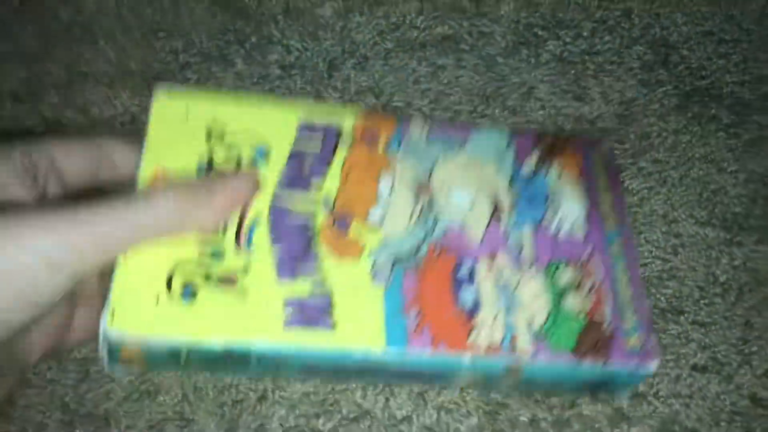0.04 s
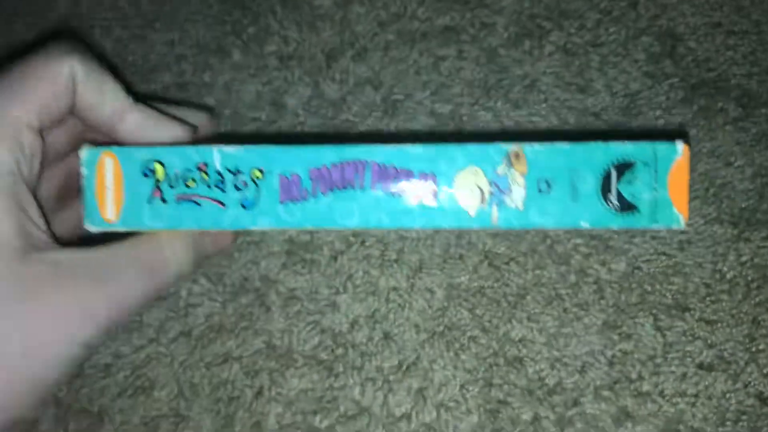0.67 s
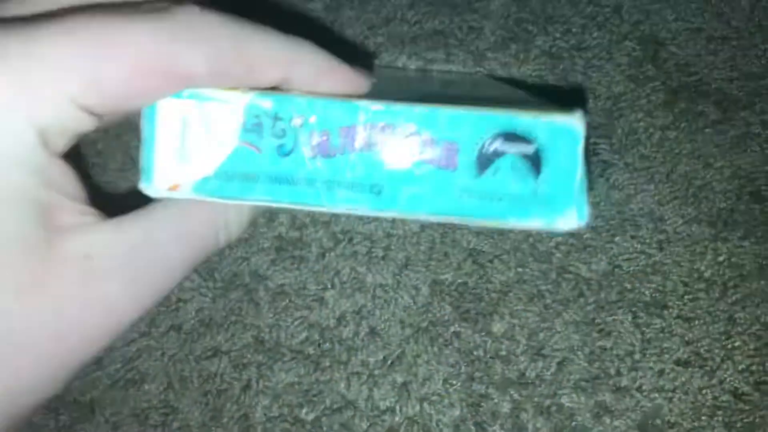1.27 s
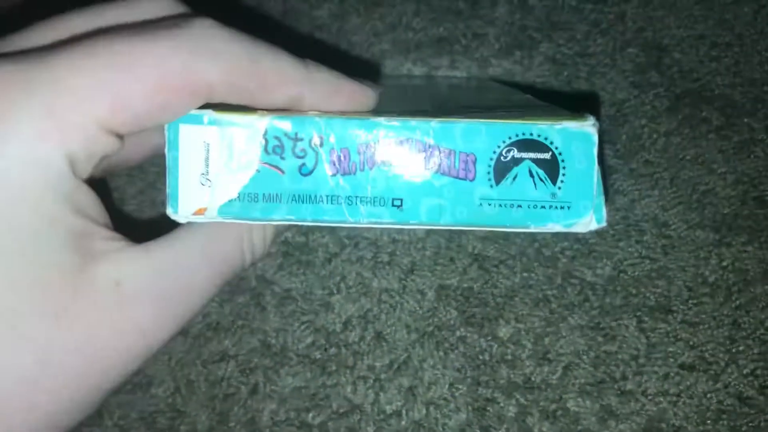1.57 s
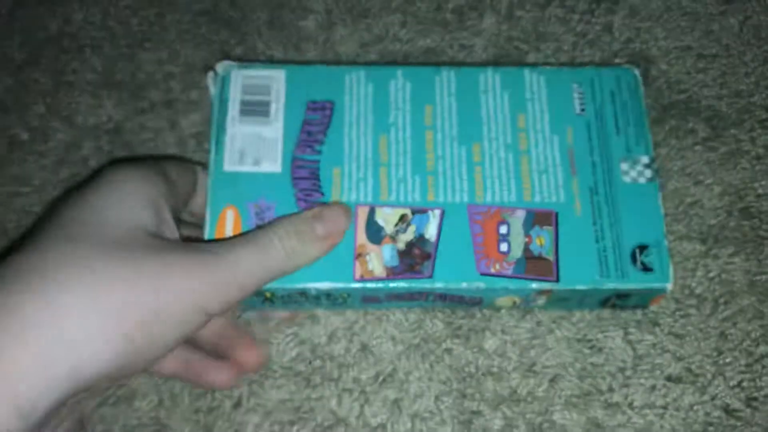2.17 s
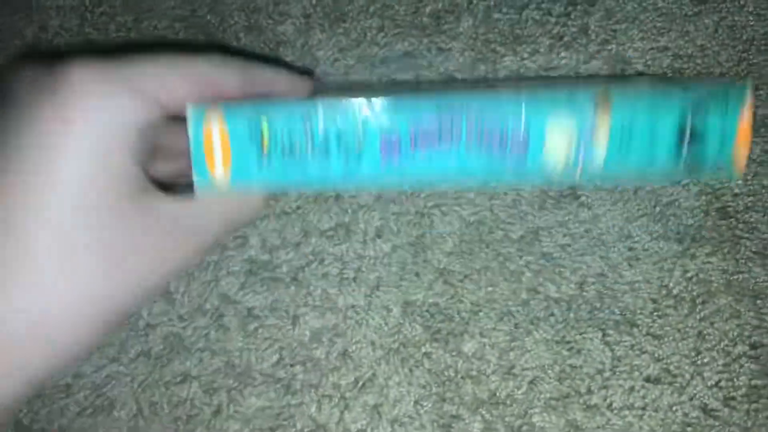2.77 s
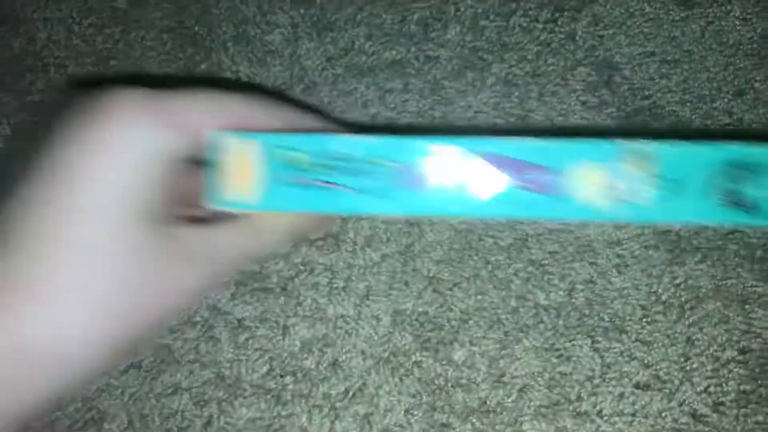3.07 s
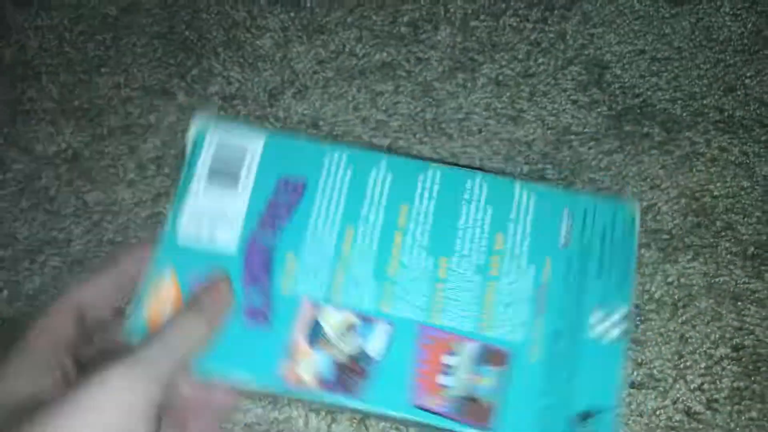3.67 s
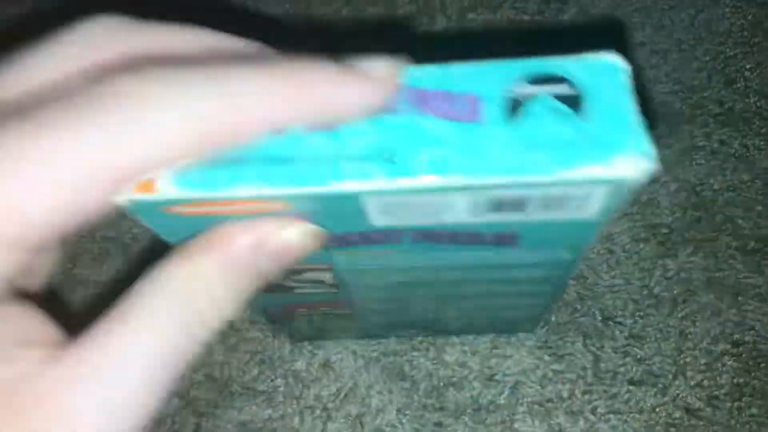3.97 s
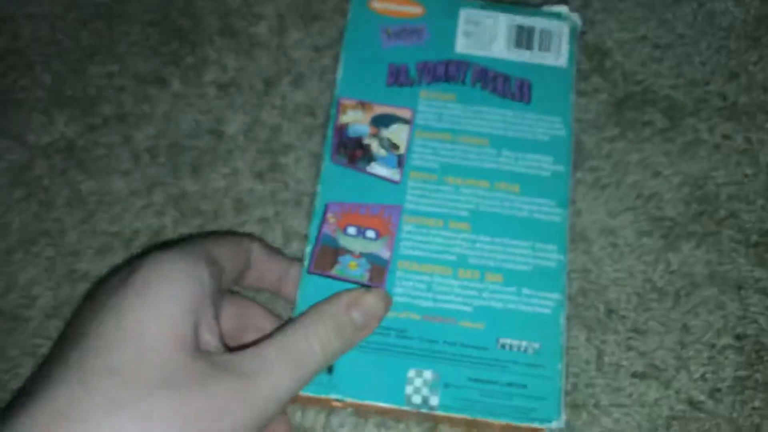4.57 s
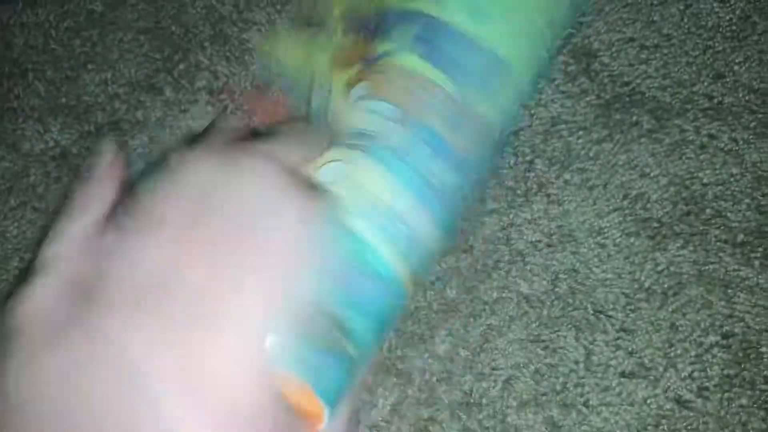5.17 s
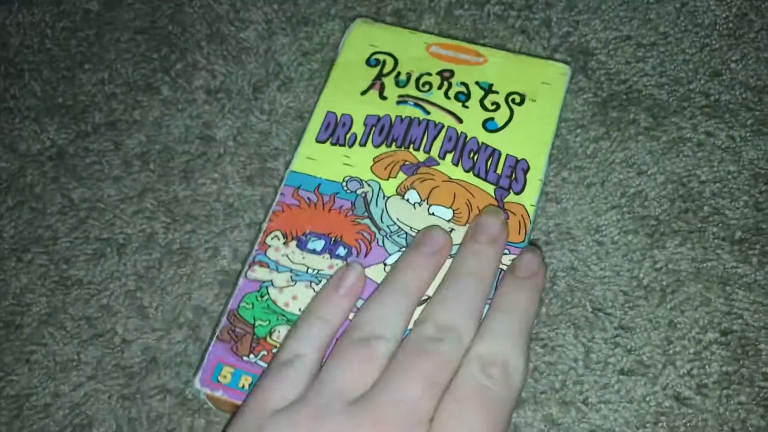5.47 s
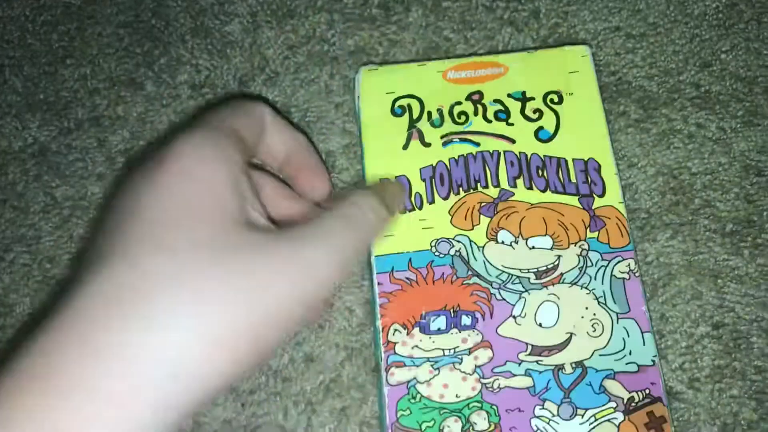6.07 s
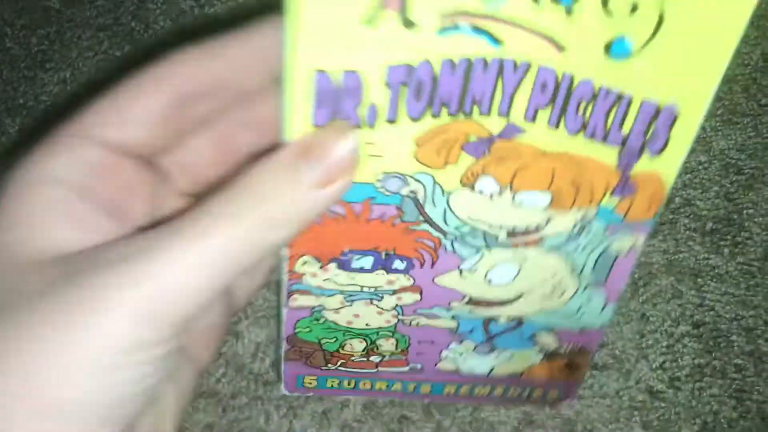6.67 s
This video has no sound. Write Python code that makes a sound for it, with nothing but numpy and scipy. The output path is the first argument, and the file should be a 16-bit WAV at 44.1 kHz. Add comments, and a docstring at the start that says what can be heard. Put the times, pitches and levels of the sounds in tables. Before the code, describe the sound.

Hollow knocks and rattles of a boxed video cassette being turned over, with fingers ticking and sliding on cardboard over a faint hum.

```python
"""A video cassette in its cardboard sleeve is turned over by hand and set down on a carpet, close up.
Each knock thumps the box and makes the loose reels clatter in the hollow plastic shell; now and then
a small steel spring inside sings on. The carpet takes the weight with a soft thud. Fingers tick and
slide on the sleeve, and a small damped room with a faint mains hum lies behind."""
import sys
import numpy as np
from scipy import signal
from scipy.fft import rfft, irfft, next_fast_len
from scipy.io import wavfile
from scipy.ndimage import uniform_filter1d, map_coordinates

SR = 44100
rng = np.random.default_rng(int(sys.argv[2]) if len(sys.argv) > 2 else 0)


def pcm_store(signal):
    """Save signal as 16-bit PCM."""
    levels = np.round(np.clip(np.atleast_2d(signal), -1, 1) * 32767)
    wavfile.write(sys.argv[1], SR, levels.astype(np.int16).T)


N = 301203
SPAN, LEAD = SR // 3, SR // 100  # samples in one hit; samples of scuff before its contact closes

# tone colour of a contact: (frequency [Hz], level [dB])
CONTACT_COLOUR = [(30, -25), (90, -2), (220, 1), (330, 9.5), (460, 4.5), (650, 4.5), (1200, -2.5),
                  (1800, -4), (3000, 2.5), (6000, -3), (8000, -6.5), (10500, -12.5), (13000, -13.5),
                  (16000, -21.5)]
# skin and carpet slide on the sleeve: (time of top speed [s], length [s], rasp [dB], hiss [dB])
STROKES = [(0.213, 0.16, -69, -59.5), (0.492, 0.33, -60, -55), (0.702, 0.23, -74, -59.5),
           (0.836, 0.28, -64, -64), (1.062, 0.25, -53.5, -54.5), (1.254, 0.16, -59, -67),
           (1.833, 0.33, -61, -58), (2.232, 0.27, -58, -59.5), (2.357, 0.13, -45, -73),
           (2.587, .25, -58, -61.5), (2.722, 0.29, -62, -56.5), (2.945, .19, -59.5, -57),
           (3.102, 0.23, -60.5, -54), (3.207, 0.24, -70, -68.5), (3.407, .25, -63.5, -57.5),
           (3.781, 0.19, -54, -53.5), (4.079, 0.2, -55.5, -57.5), (4.247, 0.1, -58, -59),
           (4.7, 0.28, -58, -66.5), (4.885, .11, -62, -62.5), (5.129, 0.24, -55.5, -55.5),
           (5.263, 0.33, -39, -52.5), (5.585, 0.51, -68, -71.5), (5.918, 0.25, -47.5, -53),
           (6.27, .34, -65.5, -71.5), (6.546, 0.36, -58.5, -63.5), (6.83, 0.22, -48.5, -51.5)]


def knocks():
    """Each contact layers a thump of the whole box, a clack of the shell and a snap of plastic edges."""
    # modes of the shell in its sleeve: (frequency [Hz], level [dB], t60 [s])
    shell_modes = [(170, -47.5, 0.06), (233, -47, 0.2), (324, -42, 0.037), (570, -42, 0.027),
                   (702, -45.5, 0.055), (920, -49, 0.026), (1076, -48, 0.038), (1294, -49, 0.048),
                   (1598, -42, 0.086), (1743, -38, 0.056), (2300, -49.5, .04), (2380, -47.5, 0.039),
                   (3010, -47, 0.034), (4340, -34.5, 0.018), (5900, -36, 0.0082), (6500, -41, .012)]
    # the grip stiffens the wide face and tunes its thump: (time [s], pitch [Hz])
    grip_pitch = [(0, 240.4), (.3, 287), (.95, 293), (1.2, 235), (2.35, 249), (2.6, 339), (3.65, 342),
                  (3.88, 245.4), (4.4, 235.3), (5.25, 287), (5.8, 235), (6.5, 335)]
    mid_clack_hz, hardness_db_per_octave = 1313, 21.5  # more snap over clack pitches the clack up
    out, pulse = np.zeros(N), click(CONTACT_COLOUR)
    t = np.maximum(np.arange(SPAN) - LEAD, 0) / SR
    for s, (thump_db, clack_db, snap_db), rise, t60 in reel_contacts():
        thump_hz = np.interp(s, *np.transpose(grip_pitch)) * np.exp(0.065 * rng.standard_normal())
        clack_hz = mid_clack_hz * 2 ** np.clip((snap_db - clack_db) / hardness_db_per_octave, -1, 1)
        face_mode = (thump_hz, -54, .27)
        shell = ring([*shell_modes, face_mode], detune=.015)
        shell[0] += 1  # the contact itself is heard along with the modes
        force = chatter(t60, rise, spiky=0.64)
        blow = signal.fftconvolve(force, signal.fftconvolve(shell, pulse))[:SPAN]
        # the wide face flexes for a few cycles, with no deep bass beneath it
        flex = np.sin(2 * np.pi * thump_hz * t) * amp(-60 * t / .036) * (1 - np.exp(-t / .0008))
        thump = amp(-4) * band(flex, 99, "high", order=2) + amp(-3) * band(blow, 550, "low")
        clack = band(blow, [clack_hz / 1.535, min(clack_hz * 1.82, SR / 4)], "band", order=2)
        snap = band(blow, 3400, "high")
        add(out, s, amp(thump_db) * thump + amp(clack_db) * clack + amp(snap_db) * snap)
    return out


def reel_contacts(rebounds=3, flight_s=.012):
    """An edge grazes, the blow lands, then the loose reels rebound, each time weaker and duller."""
    # the cassette knocks in its sleeve:
    # (time [s], thump [dB], clack [dB], snap [dB], rise [s], chatter t60 [s])
    hits = [(.001, -25.5, -35, -35, 0.00018, 0.031), (0.018, -29.5, -34.5, -39, 0.00016, 0.071),
            (0.299, -20.5, -22.5, -29.5, 0.002, 0.047), (0.305, -32, -20.5, -26.5, 0.00073, 0.034),
            (.61, -55, -48.5, -75, 0.00022, 0.02), (.891, -41, -42, -43, .0004, 0.065),
            (.944, -27.5, -29.5, -32.5, 0.00012, 0.065), (1.202, -35.5, -34.5, -35, .0007, 0.037),
            (1.932, -23.5, -24.5, -24, 0.001, 0.057), (1.938, -31.5, -16, -41, 0.00098, .014),
            (1.943, -23.5, -22, -22, .0002, 0.051), (1.962, -27.5, -28, -35.5, 0.000076, 0.043),
            (2.004, -39, -37.5, -47, 0.00032, 0.073), (2.316, -30.5, -33, -42, 0.0011, 0.049),
            (2.382, -36.5, -41, -53, 0.0011, 0.013), (2.607, -29.5, -35, -52, 0.0013, 0.01),
            (3.596, -33, -30, -34.5, .0012, .04), (3.619, -29.5, -32.5, -35.5, 0.00054, .017),
            (3.626, -34, -24.5, -29.5, 0.00012, 0.023), (3.64, -30, -27, -32.5, 0.00028, 0.048),
            (3.884, -30.5, -31.5, -33, 0.0021, .04), (4.208, -46.5, -47, -50, 0.0019, 0.023),
            (4.37, -33, -28.5, -38.5, .0004, 0.034), (4.409, -13, -12.5, -15.5, 0.00034, 0.023),
            (4.416, -18, -17.5, -19, 0.00041, 0.036), (4.447, -31.5, -32, -43.5, .001, 0.064),
            (5.056, -37, -51, -50, 0.00061, 0.0072), (5.179, -32, -35, -38, .0005, 0.031),
            (5.193, -15.5, -19.5, -17, 0.00021, 0.0084), (5.201, -34, -25.5, -24, 0.0022, .04),
            (5.233, -34.5, -32, -33.5, .0014, 0.033), (5.279, -25, -16.5, -23, 0.00035, 0.014),
            (5.302, -26, -26.5, -33.5, 0.0021, 0.053), (5.604, -48, -46.5, -55, 0.00067, 0.034),
            (5.797, -28.5, -29.5, -41.5, 0.00064, 0.032), (5.834, -35, -34.5, -39, 0.0013, 0.017),
            (5.925, -36, -41.5, -42, 0.0013, 0.017), (6.488, -47, -41.5, -42.5, 0.00055, 0.051),
            (6.52, -43.5, -43, -59, .0007, 0.041)]
    lingers = np.array([3.5, 1.6, 1.4])  # rebound decay of thump, clack and snap, in chatter t60s
    graze_ahead_s, graze_db, graze_rise_s, graze_t60_s = .0022, -14.5, .001, .023
    softening = .03  # seconds of extra rise per second of delay
    for s, *levels_db, rise, t60 in hits:
        yield s - graze_ahead_s, np.add(levels_db, graze_db), graze_rise_s, graze_t60_s
        flights = flight_s * np.exp(.15 * rng.standard_normal(rebounds))
        for delay in np.r_[0, np.cumsum(flights)]:
            yield s + delay, levels_db - 60 * delay / (lingers * t60), rise + softening * delay, t60


def chatter(t60, rise, spiky):
    """Force of one contact: a scuff swells into a dying shower of tiny, uneven impacts."""
    t, rise = (np.arange(SPAN) - LEAD) / SR, max(rise, 1 / SR)
    knots = t[::20]
    sizes = np.exp(spiky * np.interp(t, knots, rng.standard_normal(len(knots))))
    swell = (1 + np.tanh(t / rise / 2)) / 2
    decay = amp(-60 * np.maximum(t, 0) / max(t60, .002))
    force = rng.standard_normal(SPAN) * sizes * swell * decay
    force[LEAD] += np.linalg.norm(force) * 0.0001 / rise  # a harder contact has a stronger first impact
    return force


def landings():
    """The carpet takes the weight softly, so only the lowest modes of the box answer."""
    # the box comes down: (time [s], level [dB], main mode [Hz])
    set_downs = [(1.936, -23.5, 226), (4.4131, -17.5, 248), (5.197, -32.5, 289), (5.281, -18.5, 213)]
    # modes of the box on the pile: (frequency [multiple of main mode], level [dB], t60 [s])
    cushioned_modes = [(.55, -6, .03), (1, 0, .045), (2.56, -4, .04)]
    out = np.zeros(N)
    soft_attack = 1 - np.exp(-np.arange(SPAN) / SR / 0.0015)
    for s, db, hz in set_downs:
        thud = soft_attack * ring(np.array(cushioned_modes) * [hz, 1, 1])
        add(out, s, amp(db) * burst(np.pad(thud, (LEAD, 0))))
    return out


def spring():
    """The steel leaf that holds the reels is jostled and sings on after the clack."""
    # jolts to the spring: (time [s], relative level [dB])
    plucks = [(1.203, -44), (1.952, -32.5), (2.127, -51), (2.216, -52.5), (2.296, -52), (2.327, -46.5),
              (3.599, -32.5), (3.629, -36), (4.369, -38.5), (4.423, -33.5)]
    # modes of the leaf: (frequency [Hz], level [dB], t60 [s])
    leaf_modes = [(1488, 0, .2), (1530, -7, .13), (1690, -10, .13), (1895, -11, .07), (2340, -15, .15)]
    out = np.zeros(N)
    for s, db in plucks:
        jolt = chatter(t60=0.036, rise=.001, spiky=.4)
        add(out, s, amp(db + 3.5) * burst(signal.fftconvolve(jolt, ring(leaf_modes))))
    return out


def ticks():
    """Nails and sleeve edges, and now and then the loose reels inside, touch too lightly to set the whole box
    ringing."""
    # the clear ticks: (time [s], tap [dB], snap [dB], scuff t60 [s])
    clear_ticks = [(.096, -47, -55, .09), (.179, -50, -83, .055), (.242, -47.5, -54, 0.05),
                   (.923, -44, -49, 0.028), (1.107, -66, -53, 0.025), (1.147, -47.5, -46, 0.037),
                   (1.188, -46, -44, 0.0089), (1.494, -58, -60, 0.013), (1.524, -64, -82, 0.013),
                   (1.841, -45.5, -48, .04), (1.92, -41, -47, 0.017), (2.238, -48.5, -53, 0.031),
                   (2.272, -54, -57, 0.0096), (2.329, -39.5, -62, 0.009), (2.353, -61, -47, 0.088),
                   (2.516, -49, -51, .024), (2.88, -54, -73, 0.031), (2.967, -38.5, -41.5, 0.0099),
                   (3.861, -47, -48, 0.11), (3.917, -36.5, -41.5, 0.024), (4.025, -49, -46, 0.02),
                   (4.079, -45, -47.5, 0.017), (4.31, -45, -49, 0.18), (4.714, -56.5, -53.5, 0.024),
                   (4.754, -56.5, -65, 0.043), (4.851, -50.5, -49.5, 0.0064), (5.033, -51, -53, .022),
                   (5.149, -36, -36, .028), (5.815, -39.5, -42, 0.035), (6.105, -65, -64.5, .008),
                   (6.135, -59, -61, 0.012), (6.577, -46, -47.5, .015), (6.683, -47, -48.5, 0.073)]
    out, pulse = np.zeros(N), click(CONTACT_COLOUR)
    for s, tap_db, snap_db, t60 in [*clear_ticks, *faint_ticks()]:
        scuff = chatter(t60, rise=0.078 * t60, spiky=0.88)  # long scuffs also start softly
        touch = signal.fftconvolve(scuff, pulse)
        tap = band(touch, [850, 4000], "band", order=2)
        snap = band(touch, 4000, "high")
        add(out, s, amp(tap_db) * tap + amp(snap_db) * snap)
    return out


def faint_ticks(t60=.018):
    """A finger lands once around the fastest part of each stroke, near the level of its hiss."""
    for s, length, _, hiss_db in STROKES:
        db = hiss_db - 2 + 3 * rng.standard_normal()
        yield s + length * (rng.random() - .5) / 2, db, db, t60


def sliding():
    """Friction is a stream of tiny slips that swells with speed: coarse ones rasp, fine ones hiss."""
    # colours of the low rasp, the hiss and the sheen on top, each (frequency [Hz], level [dB])
    rasp_colour = [(100, -23.5), (280, 8.5), (500, 2), (800, 0), (1200, -1), (1800, -0.5), (2800, -8),
                   (5000, -16.5), (9000, -48.5)]
    hiss_colour = [(900, -24), (2200, -2), (3400, 6.5), (4800, 2.5), (6200, 7.5), (7800, 0.5), (9000, 5),
                   (10500, -30.5), (16000, -31)]
    sheen_colour = [(3000, -34), (7000, -7), (9200, 2), (12000, 2), (14500, -0.5), (16000, 0)]
    swell_share = 0.61  # part of a stroke spent speeding up
    snags_per_s, snag_db = 110, 13.5
    t = np.arange(N) / SR
    fastest, lengths, rasp_db, hiss_db = np.transpose(STROKES)
    sheen_db = hiss_db - 3.5 - 0.12 * (rasp_db - hiss_db)  # pressing harder dulls the sheen
    phase = [np.interp((t - s) / length, [-swell_share, 0, 1 - swell_share], [0, np.pi / 2, np.pi])
             for s, length in zip(fastest, lengths)]
    speed = np.sin(phase) ** 2
    grip = amp(1.2 * wobble(45))
    # now and then a fibre snags and lets go with a tiny scratch
    snags = (rng.random(N) < snags_per_s / SR) * rng.standard_normal(N) * amp(snag_db)
    out = np.zeros(N)
    for levels_db, colour in ((rasp_db, rasp_colour), (hiss_db, hiss_colour), (sheen_db, sheen_colour)):
        slips = rng.standard_normal(N) * amp(2.1 * wobble(900) + 0.98 * wobble(23))
        out += (amp(levels_db) @ speed) * coloured(slips + snags, colour)
    return finger_shading(grip * out, depth_db=1.8)


def finger_shading(x, depth_db):
    """Fingers cover changing parts of the sleeve, so its colour drifts in patches of about 0.1 s."""
    spectra = signal.stft(x, nperseg=512)[2]
    patches = uniform_filter1d(rng.standard_normal(spectra.shape), size=8, axis=0)
    patches = uniform_filter1d(patches, size=18, axis=1)
    return signal.istft(spectra * amp(depth_db * unit(patches)), nperseg=512)[1][:N]


def room(x, places=12):
    """The room's short reverb, crossfading from one tail to the next as the box moves."""
    # decay of the damped room: (frequency [Hz], t60 [s])
    decay_times = [(100, .2), (300, .19), (1500, .24), (5000, .17), (14000, .12)]
    out, position = np.zeros(N), np.linspace(0, places - 1, N)
    for place in range(places):
        hz, age, spectra = signal.stft(rng.standard_normal(SPAN), SR, nperseg=256)
        envelope = amp(-60 * age / along(decay_times, hz)[:, None]) * (1 - np.exp(-age / 0.0019))
        tail = signal.istft(spectra * envelope, SR, nperseg=256)[1]
        crossfade = np.maximum(1 - abs(position - place), 0)
        out += signal.oaconvolve(x * crossfade, tail / np.linalg.norm(tail))[:N]
    return out


def room_tone():
    """A bed of still air and a slightly unsteady mains hum."""
    # colour of the air: (frequency [Hz], level [dB])
    air_colour = [(18, -55.5), (28, -24.5), (42, -6.5), (65, 3.5), (110, -5), (170, -7.5), (340, -16),
                  (470, -23), (1100, -24), (2400, -32), (4000, -32.5), (7000, -37.5), (13000, -39.5),
                  (16000, -44.5)]
    # mains harmonics: (frequency [Hz], relative level [dB])
    hum_partials = [(59.5, -64), (119, -65.5), (179, -85)]
    hum, t = np.zeros(N), np.arange(N) / SR
    for hz, db in hum_partials:
        level = amp(db + 3 + 1.2 * wobble(5))
        hum += level * np.sqrt(2) * np.sin(2 * np.pi * hz * t + .2 * wobble(1.2))
    return hum + amp(-58) * coloured(rng.standard_normal(N), air_colour)


def ring(modes, detune=0):
    """Damped modes; grip and point of contact vary their strengths and, with detune, their pitches."""
    t = np.arange(SPAN) / SR
    hz, db, t60 = np.transpose(modes)[:, :, None]
    db = db + 2 * rng.standard_normal(db.shape)
    hz = hz * (1 + detune * rng.standard_normal(hz.shape))
    return np.sum(amp(db - 60 * t / t60) * np.cos(2 * np.pi * hz * t), axis=0)


def click(spectrum, size=2048):
    """The minimum-phase pulse with this (Hz, dB) spectrum."""
    cepstrum = irfft(np.log(amp(along(spectrum, np.fft.rfftfreq(size, 1 / SR)))))
    fold = np.r_[1, np.full(size // 2 - 1, 2), 1, np.zeros(size // 2 - 1)]
    return irfft(np.exp(rfft(cepstrum * fold)))


def band(x, edges_hz, kind, order=3):
    """One causal band of a hit, scaled as a burst."""
    return burst(signal.sosfilt(signal.butter(order, edges_hz, kind, fs=SR, output="sos"), x))


def burst(x):
    """Scale a short sound to the energy of 10 ms at rms 1."""
    return x / np.linalg.norm(x) * np.sqrt(SR / 100)


def add(track, s, sound):
    """Mix a sound into the track so that its contact closes at s seconds."""
    start = round(s * SR) - LEAD
    sound = sound[max(-start, 0):]
    part = track[max(start, 0):][:len(sound)]
    part += sound[:len(part)]


def coloured(x, spectrum):
    """EQ x by (Hz, dB) points, at rms 1."""
    return unit(filtered(x, lambda hz: amp(along(spectrum, hz))))


def filtered(x, response):
    """Filter x by a gain that is a function of frequency."""
    size = next_fast_len(N + SPAN)
    return irfft(rfft(x, size) * response(np.fft.rfftfreq(size, 1 / SR)), size)[:N]


def along(points, hz):
    """Read (Hz, value) points on a log axis."""
    frequencies, values = np.transpose(points)
    return np.interp(np.log(hz + 1), np.log(frequencies + 1), values)


def wobble(rate):
    """A smooth random curve, rate knots a second."""
    return map_coordinates(rng.standard_normal(int(N * rate / SR) + 4), [np.arange(N) * rate / SR])


def amp(db):
    """Decibels to gain."""
    return 10 ** (np.asarray(db) / 20)


def unit(x):
    """Scale to rms 1."""
    return x / np.sqrt(np.mean(x ** 2) + 1e-20)


def scene():
    """The cassette's hits with a touch of reverb, over dry friction and room tone, in mono."""
    box = knocks() + landings() + ticks() + spring()
    return (box + amp(-14) * room(box) + sliding() + room_tone())[None]


def record(dry):
    """The microphone rounds off the highest peaks and keeps nothing above its band limit."""
    top_hz = 16100
    rounded = dry[0] / (1 + dry[0] ** 6) ** (1 / 6)
    return filtered(rounded, lambda hz: 1 / np.sqrt(1 + (hz / top_hz) ** 160))[None]


dry = scene()
out = record(dry)
pcm_store(out)
```